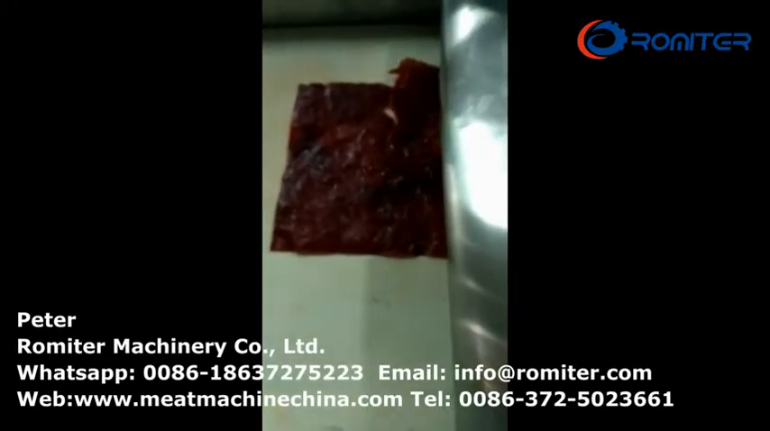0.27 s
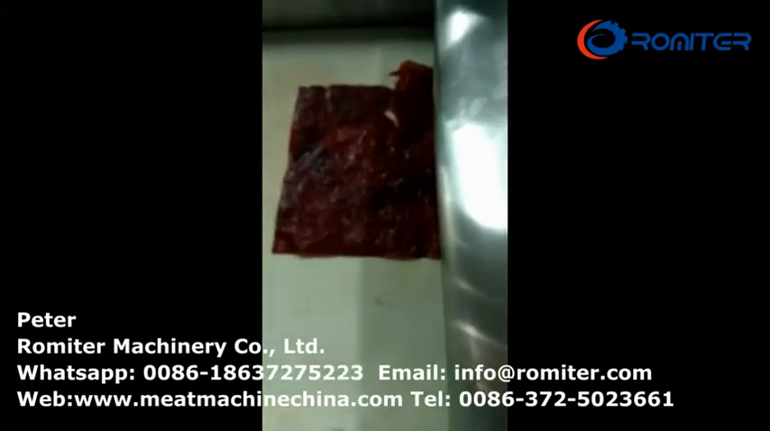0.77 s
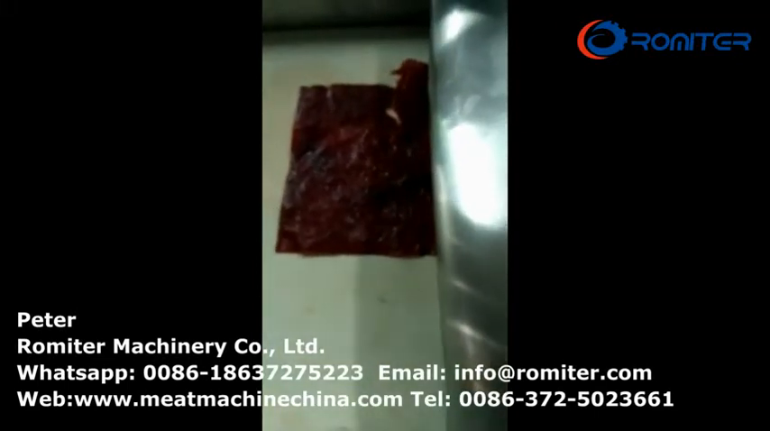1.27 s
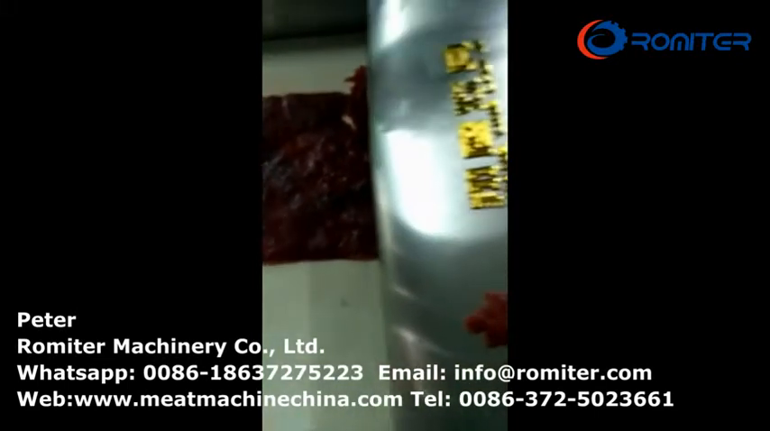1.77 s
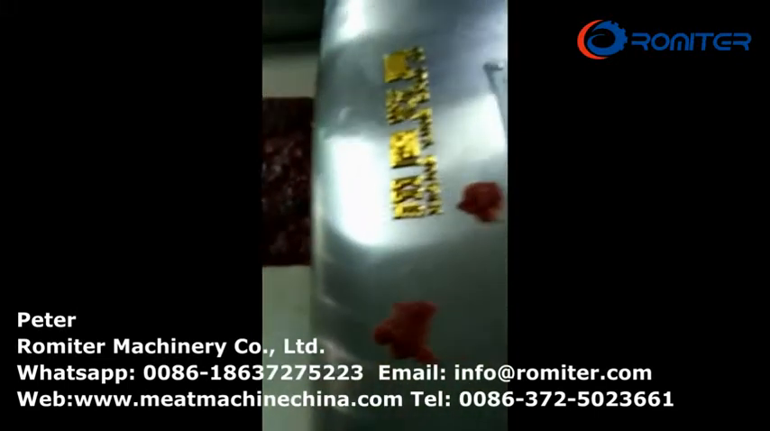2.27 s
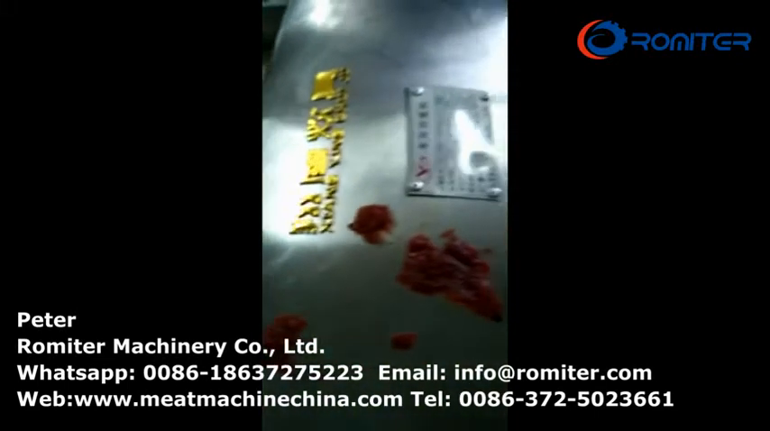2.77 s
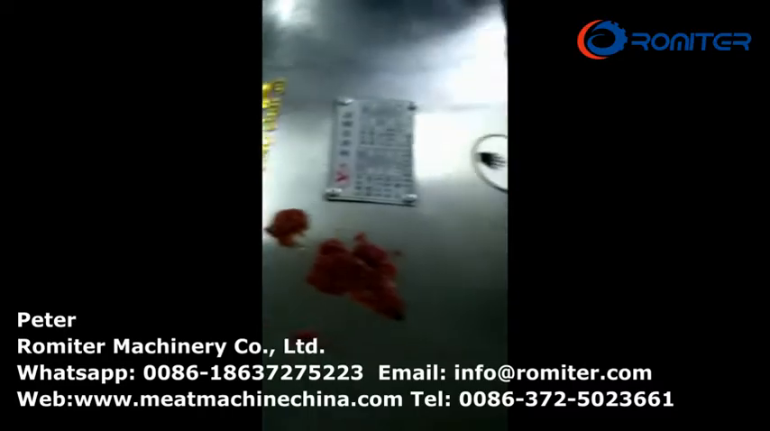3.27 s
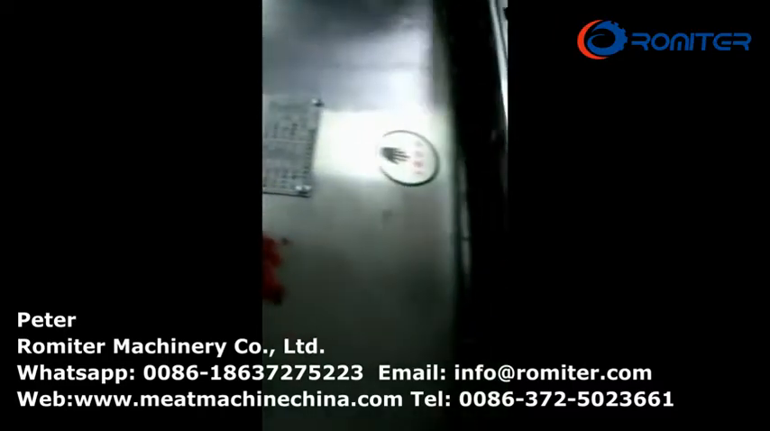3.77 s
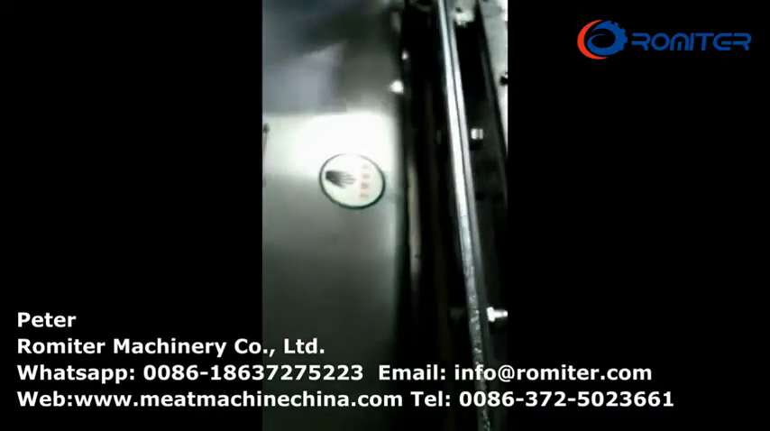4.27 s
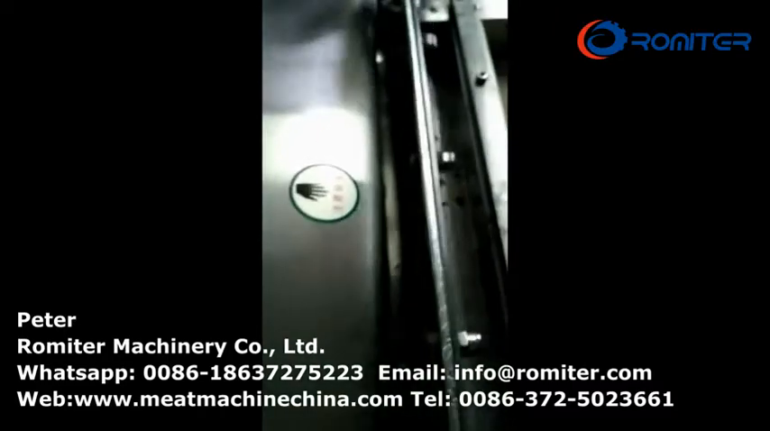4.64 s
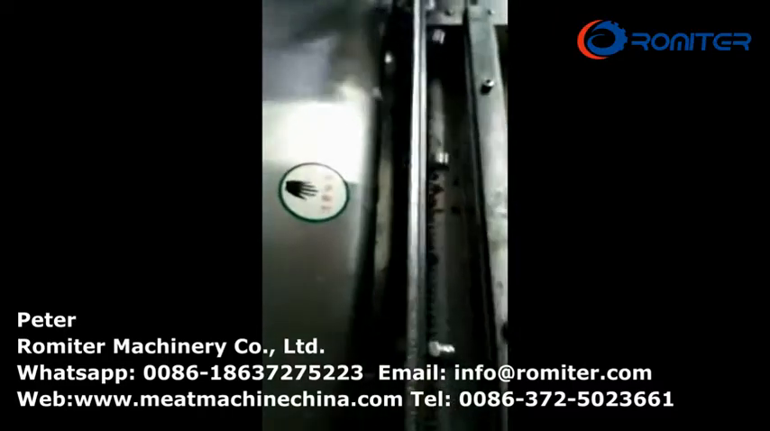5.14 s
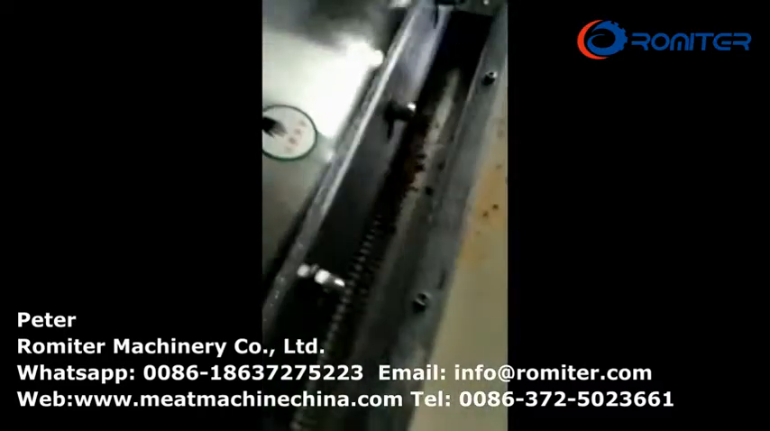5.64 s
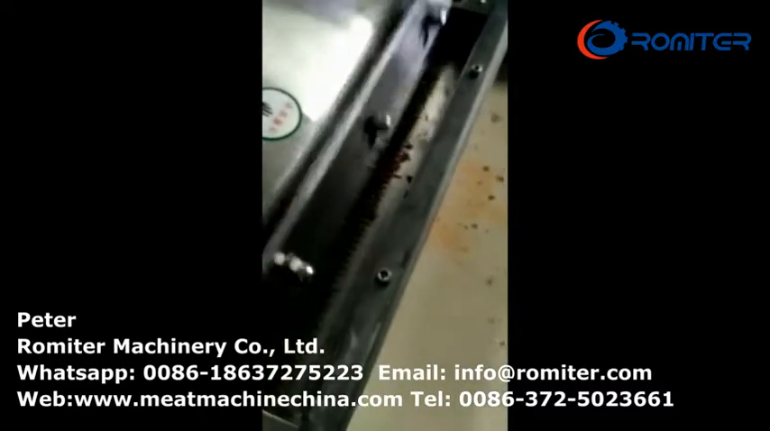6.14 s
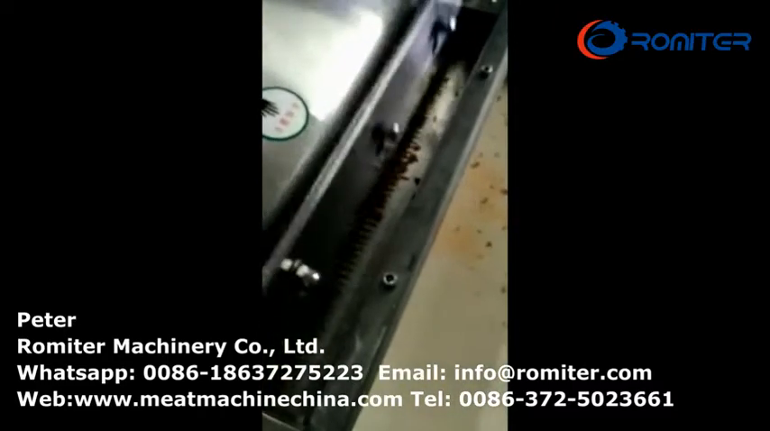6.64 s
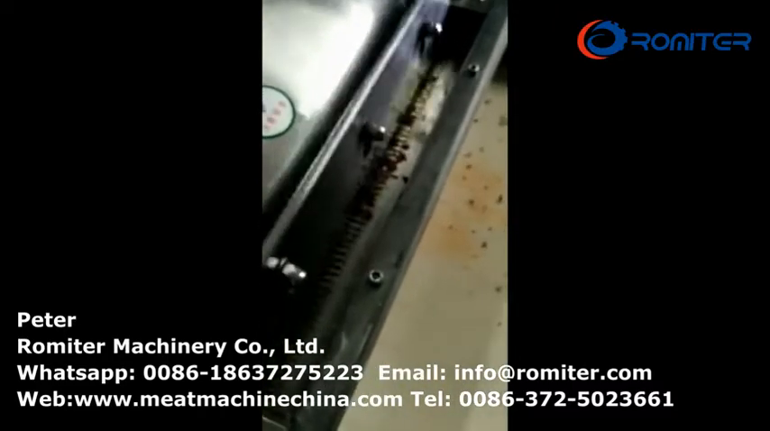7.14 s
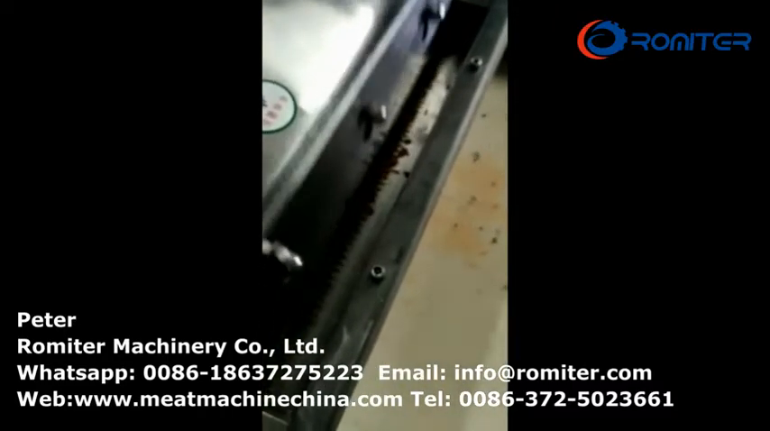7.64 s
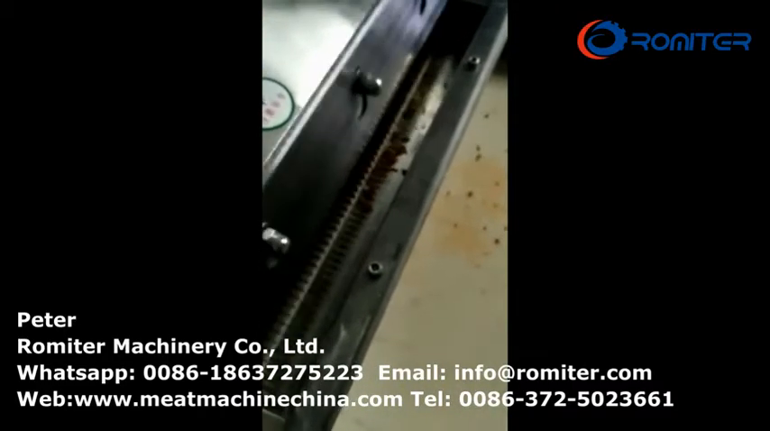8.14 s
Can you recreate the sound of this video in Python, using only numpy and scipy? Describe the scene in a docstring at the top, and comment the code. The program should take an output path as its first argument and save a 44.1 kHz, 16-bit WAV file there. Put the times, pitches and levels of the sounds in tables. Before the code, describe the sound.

A steel cutting machine pounds steadily in a factory hall, its blade scraping, thumping and clacking, loose parts rattling, growing squealier and heavier.

```python
"""Meat dicer in a factory hall

Close by, just under three strokes a second: the blade scrapes in with a thin squeal, cuts with a thump that shakes
the frame, clacks on its stop and knocks more softly on the way back. Loose parts rattle, the housing rings, a motor hums.
Contacts are chattering impulses into decaying noise; thump, boom and squeal are damped sines; the hum is wavering sines.
The hall is filtered noise. Slow curves follow the load and a microphone moving from feed tray to outlet."""
import sys
import numpy as np
from scipy import signal
from scipy.fft import rfft, irfft, next_fast_len
from scipy.io import wavfile

SR = 44100
rng = np.random.default_rng(int(sys.argv[2]) if len(sys.argv) > 2 else 0)


def generate_wav(signal):
    """Clip the signal to [-1, 1] and save it as 16-bit WAV at the path in sys.argv[1]."""
    frames = np.transpose(np.atleast_2d(signal))
    scaled = np.clip(frames, -1, 1) * 32767
    pcm = np.round(scaled).astype(np.int16)
    wavfile.write(sys.argv[1], SR, pcm)


N = 370440
CUTOFF_HZ = 16000
RING_T_S = np.arange(16384) / SR

# Colour of scrape, graze and ticks, relative spectrum: freq_hz, level_db
SCRAPE_SPECTRUM = [(700, -35), (1500, -7), (2200, -10.5), (3400, -4.5), (4900, 1), (6000, 2), (8200, -2.5),
                   (10500, 1.5), (12300, 7.5), (14000, -8), (15800, -16)]
# Colour of the cut: freq_hz, relative level_db
CUT_SPECTRUM = [(600, -9), (1300, -31), (2000, -0.5), (2450, -5.5), (2950, 0.5), (3800, 1.5), (4800, -8),
                (5600, 6), (7000, -3.5), (9300, -0.5), (12200, 0), (14000, -4), (15800, -9)]
# Colour of the clack on the stop: freq_hz, relative level_db
CLACK_SPECTRUM = [(700, -13), (1500, -16), (2300, 0), (2850, 7.5), (3400, 5), (4600, -2), (6600, -3.5),
                  (9200, -12.5), (11000, -9), (12600, -11.5), (14000, -16), (15800, -32)]
# Colour of the return knock and loose parts: freq_hz, relative level_db
RETURN_SPECTRUM = [(900, -10), (1900, -0.5), (2450, -5), (3400, 6), (4200, 2.5), (6600, -2.5), (8000, -2),
                   (9200, -8.5), (11000, -5.5), (12700, -3.5), (15800, -18)]
# Colour of the sheet-steel covers: freq_hz, relative level_db
COVER_SPECTRUM = [(300, -9.5), (420, -6.5), (560, -2.5), (710, -14), (860, -1.5), (1060, -1), (1300, -0.5),
                  (1600, -4.5), (2050, -2.5), (2700, -12.5), (5000, -11.5)]
# Colour of the cabinet walls' rumble: freq_hz, relative level_db
CABINET_SPECTRUM = [(60, -20), (120, -10), (220, -11), (310, 2.5), (400, 0.5), (520, -11.5), (700, -14),
                    (1500, -35)]
# Colour of the cabinet shudder at the stop: freq_hz, relative level_db
STOP_SHUDDER_SPECTRUM = [(55, -12), (85, -2), (115, 7.5), (165, -3), (230, 0.5), (310, 2), (420, -6.5),
                         (560, 0), (750, -20), (1500, -26)]
# Colour of the cabinet shudder at the turn: freq_hz, relative level_db
TURN_SHUDDER_SPECTRUM = [(55, -5), (85, -2.5), (120, -5), (170, -9.5), (240, -0.5), (400, -1.5), (570, -15),
                         (900, -12)]
# Noise of the hall: freq_hz, relative density_db
HALL_SPECTRUM = [(25, -26), (50, -7.5), (100, -0.5), (170, -3), (300, 3), (450, -2), (600, 1), (800, -7),
                 (1300, -11), (2200, -15.5), (4300, -17.5), (6000, -13), (8500, -19), (12000, -13),
                 (15800, -30)]
# Hum lines of the motor: freq_hz, mean rms level_db
HUM_LINES = [(86.5, -53), (100, -59), (193, -52.5), (391, -77), (646, -47.5)]

# Modes of the hollow thump: freq_hz, relative level_db, t60_s
THUMP_RING = [(308, 3, 0.022), (347, 7.5, 0.05), (381, 9, 0.048)]
# Modes of the frame boom: freq_hz, relative level_db, t60_s
FRAME_RING = [(48.1, -5.5, 0.68), (56, 5, 0.28), (72, -29, .14), (112.5, -12, 0.41), (164.6, -11, 0.49)]
# Modes of the squealing blade: freq_hz, relative level_db, t60_s
SQUEAL_RING = [(12857, 0, .12), (12790, -8, .05), (5066, -9, .09), (13700, -11, .1)]
# Modes of the squeaking guide: freq_hz, relative level_db, t60_s
SQUEAK_RING = [(1510, 12, 0.063), (1580, -19, .04)]

# Curve and event levels below are dB before each layer's own gain and the stroke spread.
# Microphone position along the machine: time_s, cabinet_shudder_db, hall_noise_db
POSITION_CURVE = [(0, -38, -34.5), (1.2, -28, -35), (2.4, -38, -36), (3.8, -36, -36), (5, -39, -35),
                  (6.2, -45.5, -36), (7, -35.5, -37), (8.4, -35.5, -34.5)]
# Microphone passing feed tray, covers, outlet: time_s, treble_db, clack_db, frame_boom_db
APPROACH_CURVE = [(0, -1.5, -12.5, -61), (1.1, 2.5, -12, -60), (1.8, -2.5, -11, -48), (2.5, 6, -13, -43.5),
                  (3.4, 7.5, -11, -41.5), (4.4, 3, -10.5, -35.5), (5.8, 2.5, -10.5, -37),
                  (6.7, -1, -9.5, -33), (8.4, 2.5, -10.5, -27.5)]
# Covers' answer to the cut: time_s, level_db, centre of ring_hz
COVER_CURVE = [(0.3, -19.5, 1350), (0.64, -24, 1490), (1.0, -20, 885), (1.34, -21.5, 846), (1.7, -20, 2080),
               (2.04, -18.5, 2070), (2.74, -23, 1630), (3.1, -22, 1220), (4.13, -22.5, 1250),
               (4.5, -31.5, 1280), (6.2, -36, 834), (8.4, -32, 830)]
# Force of the forward stroke as meat feeds through: time_s, scrape_db, thump_db, cut_db
LOAD_CURVE = [(0.3, -33, -22.5, -18), (1.3, -36, -24, -22), (2.0, -18.5, -22, -23), (3.0, -21, -16, -19.5),
              (4.1, -21, -16.5, -19.5), (4.9, -16.5, -20, -15.5), (6.2, -16.5, -23, -21),
              (7.2, -19, -23, -18.5), (8.3, -19.5, -22, -19.5)]
# Back stroke: time_s, level_db, brightness_db
BACK_STROKE_CURVE = [(0.15, -20.5, 12), (0.5, -18, 7), (0.85, -25.5, 3), (1.9, -21.5, 8), (3.9, -24.5, 7.5),
                     (4.4, -30.5, 0), (5.1, -25, 2), (6.4, -28.5, 3), (6.8, -23.5, 4), (8.2, -21, 1)]
# Bounce of the loose parts: time_s, after_clack_db, after_return_db
LOOSENESS_CURVE = [(0.3, -17.5, -11.5), (1.2, -13, -14.5), (1.8, -8.5, -25), (2.3, -20, -21.5),
                   (3.8, -28, -19.5), (4.3, -12, -14), (5.3, -26, -11), (6.1, -26, -33),
                   (6.7, -10.5, -11.5), (7.3, -23, -19), (8.4, -34, -9.5)]
# Centre of the standout ring: time_s, blade_at_cut_hz, blade_at_stop_hz, covers_after_clack_hz
RING_CURVE = [(0.3, 3040, 3040, 1260), (1.1, 3250, 3240, 1130), (1.75, 2670, 3250, 1870),
              (2.1, 2600, 3000, 1330), (2.45, 3160, 4330, 1240), (3.15, 2880, 4300, 1300),
              (3.5, 3320, 2800, 1490), (4.2, 3150, 3770, 1480), (4.9, 2770, 3400, 1540),
              (6.2, 2800, 3700, 1700), (6.7, 2950, 2780, 1750), (8.4, 2770, 2900, 1600)]
# Friction of the slide: time_s, squeal_db, scrape_brightness_db
FRICTION_CURVE = [(0.3, -46, -11), (1.65, -43, -27), (2.1, -33, -1), (3.0, -27, 3), (4.4, -20, 0),
                  (5.0, -15, -6), (5.5, -35, -5), (6.0, -19, -4), (6.9, -22, -10), (7.8, -22, -6),
                  (8.3, -20, -1)]
# Sharp ticks, mostly as the blade starts to slide, one (4.377) a bright bounce after the return: time_s, level_db
TICK_EVENTS = [(3.7618, -5.5), (4.1082, -5.5), (4.377, -3), (4.461, -7), (4.808, -4.5), (5.157, -2),
               (6.206, -4), (6.9057, -2), (7.2576, -5), (7.6066, -15)]
# Thump pitch, deeper toward the outlet: time_s, shift as a share
THUMP_SHIFT_CURVE = [(0, 0.012), (4.0, -0.0047), (8.4, -0.045)]

# Even crank; contact places count from the clack
FIRST_CLACK_S, STROKE_S = 0.0063, 0.3496
SLIDE_S, PUSH_S, CUT_S, RETURN_S = -0.0915, -0.0752, -0.068, 0.1466
# Bounce delays after the clack and after the return
CLACK_BOUNCE_S, RETURN_BOUNCE_S = 0.046, 0.030
# Spans (from, to) of guide squeak, edge ticks and blade grazes
SQUEAKING_S, TICKING_S, GRAZING_S = (2.2, 4.3), (2, 7), (4, 8.4)
# Random spread between strokes: level; log ring pitch
STROKE_SPREAD_DB, RING_SPREAD = 0.5, 0.031
# Swing added on even strokes, taken off on odd ones
SCRAPE_SWING_DB, SQUEAL_SWING_DB = -0.4, 4
CLACK_BRIGHT_DB, TICK_BRIGHT_DB = 8.5, 6
CLACK_BOUNCE_BRIGHT_DB, RETURN_BOUNCE_BRIGHT_DB = -4.5, 8.5


def from_db(db):
    """Gain of a level in dB."""
    return 10 ** (np.asarray(db) / 20)


def at_level(x, db, count):
    """Scale so the first count samples have this rms level."""
    return x * from_db(db) / np.sqrt(np.mean(x[:count] ** 2) + 1e-20)


def add(out, s, x):
    """Mix a sound in at time s."""
    i = int(np.clip(round(s * SR), 0, N))
    out[i:i + len(x)] += x[:N - i]


def dying(t60_s):
    """Exponential decay that loses 60 dB in t60_s."""
    return np.exp(-np.log(1000) * RING_T_S / max(t60_s, 1e-3))


def coloured(x, points, bright_db=0, peak_hz=1000, peak_db=0):
    """Minimum-phase filter through (Hz, dB) points, tipped around 5 kHz, with one optional resonance."""
    size = next_fast_len(len(x) // 2 + 1) * 2
    log_hz = np.log(np.maximum(np.fft.rfftfreq(size, 1 / SR), 1))
    hz, db = np.transpose(points)
    body_db = np.interp(log_hz, np.log(hz), db)
    skirt_db = 18 * np.minimum(log_hz - np.log(hz[0]), 0)
    tilt = np.interp(log_hz, np.log([3000, 10000]), [-.5, .5])
    resonance_db = peak_db / (1 + ((log_hz - np.log(peak_hz)) / 0.1) ** 2)
    gain = from_db(body_db + skirt_db + bright_db * tilt + resonance_db)
    # Folding the cepstrum makes the filter causal
    cepstrum = irfft(np.log(gain))
    cepstrum[1:size // 2] *= 2
    cepstrum[size // 2 + 1:] = 0
    return irfft(rfft(x, size) * np.exp(rfft(cepstrum)))[:len(x)]


def strokes(place_s, span_s=(0, N / SR)):
    """Times at which the crank passes one place in its stroke."""
    s = np.arange(FIRST_CLACK_S, N / SR + STROKE_S, STROKE_S) + place_s
    return s[(s >= span_s[0]) & (s < span_s[1])]


def along(curve, s):
    """Columns of a slow curve at the times s."""
    when, *columns = np.transpose(curve)
    return [np.interp(s, when, column) for column in columns]


def hits(s, db, *columns):
    """One row per contact, (s, dB, ...), with a random level spread."""
    level_db = db + STROKE_SPREAD_DB * rng.standard_normal(len(s))
    return np.column_stack(np.broadcast_arrays(s, level_db, *columns))


def ring_pitches(hz, s):
    """Ring pitch shifts with the point of contact."""
    return hz * np.exp(RING_SPREAD * rng.standard_normal(len(s)))


def alternation(s):
    """+1 and -1 in turn from stroke to stroke."""
    return 1 - 2 * (np.round((s - FIRST_CLACK_S) / STROKE_S) % 2)


def excite(body, force):
    """Response of a body to a force."""
    return signal.fftconvolve(force, body)[:len(RING_T_S)]


def modes(table, detune=0):
    """Damped sines set off together."""
    return sum(from_db(db) * dying(t60_s) * np.sin(2 * np.pi * hz * (1 + detune) * RING_T_S)
               for hz, db, t60_s in table)


def steel_plate(fixed_modes, likeness):
    """Dense modes as noise: partly shared by all strokes, partly new as the contact point shifts."""
    likeness = np.clip(likeness, 0, 1)
    return np.sqrt(likeness) * fixed_modes + np.sqrt(1 - likeness) * rng.standard_normal(len(RING_T_S))


def chatter(count, length_s, last_db):
    """First touch, then uneven bounces over about length_s whose level trends to last_db."""
    when = (np.arange(count) + rng.uniform(-.5, .5, count)) / (count - 1)
    when[0] = 0
    size = from_db(last_db * when + rng.normal(0, 2.5, count))
    size[0] = 1.6
    force = np.zeros(len(RING_T_S))
    np.add.at(force, (when * abs(length_s) * SR).astype(int), size * rng.choice([-1, 1], count))
    return force


def blows(rows, colour, chatter_s, last_db, ring_t60, tail_db, tail_t60, gain_db, likeness, count, size,
          peak_db=0):
    """Steel on steel: count bounces excite a short ring plus a tail of machine and hall."""
    out, fixed_modes = np.zeros(N), rng.standard_normal(len(RING_T_S))
    spread = 1 - np.exp(-RING_T_S / 0.00079)  # the blow spreads through the steel
    decay = spread * np.hypot(dying(ring_t60), from_db(tail_db) * dying(tail_t60))
    for s, db, bright_db, *ring_hz in rows:
        hit = excite(steel_plate(fixed_modes, likeness) * decay, chatter(count, chatter_s, last_db))
        hit = coloured(hit, colour, bright_db, *ring_hz, peak_db=peak_db)
        add(out, s, at_level(hit, db + gain_db, size))
    return out


def panels(rows, colour, swell_s, t60, gain_db, likeness, size, peak_db=0):
    """Large panels take up a blow slowly and ring on; rows are (s, dB) or (s, dB, ring Hz)."""
    out, fixed_modes = np.zeros(N), rng.standard_normal(len(RING_T_S))
    swell = (1 - np.exp(-(RING_T_S / swell_s) ** 2)) * dying(t60)
    for s, db, *ring_hz in rows:
        ring = coloured(steel_plate(fixed_modes, likeness) * swell, colour, 0, *ring_hz, peak_db=peak_db)
        add(out, s, at_level(ring, db + gain_db, size))
    return out


def friction_tone(rows, table, rub_s, gain_db):
    """Rubbing noise makes a few modes sing, slightly detuned each time; rows are (s, dB)."""
    out = np.zeros(N)
    for s, db in rows:
        body = modes(table, rng.normal(0, .003))
        rub = rng.standard_normal(len(RING_T_S)) * np.exp(-(RING_T_S / rub_s) ** 4)
        add(out, s, at_level(excite(body, rub), db + gain_db, count=1100))
    return out


def wavering(x, waver_db):
    """Low part of the noise swells and sinks unevenly, band by band."""
    edges_hz = np.geomspace(130, 1300, 9)
    knots, out = np.linspace(0, N, 110), x.copy()
    for low, high in zip(edges_hz, edges_hz[1:]):
        band = signal.sosfiltfilt(signal.butter(2, [low, high], "band", fs=SR, output="sos"), x)
        swell = np.interp(np.arange(N), knots, rng.standard_normal(len(knots)))
        out += band * (from_db(waver_db * (swell - .5)) - 1)
    return out


def motor(waver_db):
    """Drive hum: sines wavering in level and phase."""
    t, out = np.arange(N) / SR, np.zeros(N)
    knots = np.linspace(0, t[-1], 60)
    for hz, db in HUM_LINES:
        level = np.interp(t, knots, rng.standard_normal(len(knots)))
        phase = np.interp(t, knots, rng.standard_normal(len(knots)))
        out += from_db(db + waver_db * level) * np.sqrt(2) * np.sin(2 * np.pi * hz * t + .5 * phase)
    return out


def hall():
    """Hall noise: coloured noise, uneven in the lows, following the microphone position."""
    noise = wavering(coloured(rng.standard_normal(N), HALL_SPECTRUM), waver_db=5.0)
    return at_level(noise, along(POSITION_CURVE, np.arange(N) / SR)[1], N)


def clack():
    """Blade hits its stop, louder as the microphone nears."""
    s = strokes(0)
    treble_db, clack_db, _ = along(APPROACH_CURVE, s)
    rows = hits(s, clack_db, CLACK_BRIGHT_DB + treble_db, ring_pitches(along(RING_CURVE, s)[1], s))
    return blows(rows, CLACK_SPECTRUM, chatter_s=.018, last_db=-1, ring_t60=0.055, tail_db=-13.5,
                 tail_t60=0.19, gain_db=0.72, likeness=.2, count=7, size=1323, peak_db=2)


def housing():
    """Sheet-steel covers answer clack, return and cut with a slower-rising ring."""
    clack_s, back_s, cut_s = strokes(0), strokes(RETURN_S), strokes(CUT_S)
    clack_hz = ring_pitches(along(RING_CURVE, clack_s)[2], clack_s)
    cover_db, cover_hz = along(COVER_CURVE, cut_s)
    after_clack = panels(hits(clack_s, 0, clack_hz), COVER_SPECTRUM, swell_s=0.015, t60=0.19,
                         gain_db=-25, likeness=0.26, size=1984, peak_db=12.5)
    after_return = panels(hits(back_s, along(BACK_STROKE_CURVE, back_s)[0]), COVER_SPECTRUM,
                          swell_s=0.0015, t60=0.54, gain_db=-14, likeness=0.3, size=1984)
    after_cut = panels(hits(cut_s, cover_db, cover_hz), COVER_SPECTRUM, swell_s=0.0028, t60=0.17,
                       gain_db=2.5, likeness=0.033, size=1764, peak_db=9.5)
    return after_clack + after_return + after_cut


def shudder():
    """Cabinet shudders at both ends of the blade's travel, swelling slowly at the turn."""
    stop_s, turn_s = strokes(0), strokes(RETURN_S)
    stop = panels(hits(stop_s, along(POSITION_CURVE, stop_s)[0]), STOP_SHUDDER_SPECTRUM,
                  swell_s=0.0023, t60=0.39, gain_db=0.0, likeness=0.71, size=2205)
    turn = panels(hits(turn_s, along(POSITION_CURVE, turn_s)[0]), TURN_SHUDDER_SPECTRUM,
                  swell_s=0.058, t60=0.11, gain_db=-4.5, likeness=0.77, size=2205)
    return stop + turn


def rattle():
    """Loose parts bounce dully after the clack and brightly after the return."""
    dull_s, bright_s = strokes(CLACK_BOUNCE_S), strokes(RETURN_S + RETURN_BOUNCE_S)
    dull = hits(dull_s, along(LOOSENESS_CURVE, dull_s)[0], CLACK_BOUNCE_BRIGHT_DB)
    bright = hits(bright_s, along(LOOSENESS_CURVE, bright_s)[1], RETURN_BOUNCE_BRIGHT_DB)
    return blows(np.vstack([dull, bright]), RETURN_SPECTRUM, chatter_s=0.0041, last_db=-13, ring_t60=0.025,
                 tail_db=6, tail_t60=0.096, gain_db=-10.0, likeness=0.45, count=3, size=882)


def clatter():
    """Bounce after the clack shakes the covers once more."""
    s = strokes(CLACK_BOUNCE_S)
    rows = hits(s, along(LOOSENESS_CURVE, s)[0], ring_pitches(along(RING_CURVE, s)[2], s))
    return panels(rows, COVER_SPECTRUM, swell_s=0.002, t60=0.13, gain_db=-14.5, likeness=0.18, size=1100,
                  peak_db=4)


def return_knock():
    """Blade knocks on its way back: four bounces into a bright ring."""
    s = strokes(RETURN_S)
    return blows(hits(s, *along(BACK_STROKE_CURVE, s)), RETURN_SPECTRUM, chatter_s=0.022, last_db=-6.5,
                 ring_t60=0.066, tail_db=-4.0, tail_t60=0.084, gain_db=1.5, likeness=0.27, count=4, size=1323)


def slides(s):
    """Blade slides in, its level following the load: rows (s, dB, brightness dB)."""
    scrape_db = along(LOAD_CURVE, s)[0] + SCRAPE_SWING_DB * alternation(s)
    return hits(s, scrape_db, along(FRICTION_CURVE, s)[1])


def scrape():
    """Blade rubs into the machine: a growing run of small touches."""
    return blows(slides(strokes(SLIDE_S)), SCRAPE_SPECTRUM, chatter_s=0.02, last_db=9, ring_t60=0.025,
                 tail_db=-18.5, tail_t60=0.3, gain_db=-3.5, likeness=0.22, count=9, size=800)


def squeal():
    """Sliding blade sings in a few high modes, stronger on every second stroke."""
    s = strokes(SLIDE_S)
    rows = hits(s, along(FRICTION_CURVE, s)[0] + SQUEAL_SWING_DB * alternation(s))
    return friction_tone(rows, SQUEAL_RING, rub_s=0.0077, gain_db=0.5)


def push(push_s, heave_s, boom_db, boom_lag_s):
    """Stroke shoves the cabinet: hollow thump, rumble of the walls, slow boom of the frame."""
    out, when = np.zeros(N), strokes(PUSH_S)
    for s, db, frame_db in hits(when, along(LOAD_CURVE, when)[1], along(APPROACH_CURVE, when)[2]):
        detune = along(THUMP_SHIFT_CURVE, s)[0] + rng.normal(0, 0.022)
        thump = modes(THUMP_RING, detune) * (1 - np.exp(-(RING_T_S / push_s) ** 2))
        boom = modes(FRAME_RING, rng.normal(0, 0.0035)) * (1 - np.exp(-(RING_T_S / heave_s) ** 2))
        add(out, s, at_level(thump, db, count=882))
        add(out, s + boom_lag_s, at_level(boom, frame_db + boom_db, count=4410))
    rumble = panels(hits(when, 0), CABINET_SPECTRUM, swell_s=0.0081, t60=0.22, gain_db=-28, likeness=1.0,
                    size=2205)
    return out + rumble


def cut():
    """Blade meets the grid: a blow with one standout ring."""
    s = strokes(CUT_S)
    ring_hz = ring_pitches(along(RING_CURVE, s)[0], s)
    rows = hits(s, along(LOAD_CURVE, s)[2], along(APPROACH_CURVE, s)[0], ring_hz)
    return blows(rows, CUT_SPECTRUM, chatter_s=.006, last_db=-29, ring_t60=0.053, tail_db=-25, tail_t60=0.3,
                 gain_db=1.5, likeness=0.39, count=4, size=1323, peak_db=13.0)


def bite():
    """Edge ticks sharply as the push begins, louder with a harder push."""
    s = strokes(PUSH_S, TICKING_S)
    return blows(hits(s, along(LOAD_CURVE, s)[1], 0), SCRAPE_SPECTRUM, chatter_s=.003, last_db=18,
                 ring_t60=0.011, tail_db=-30, tail_t60=0.58, gain_db=3.5, likeness=0.12, count=2, size=350)


def squeak():
    """Guide squeaks: rubbing sets off its two modes."""
    rows = hits(strokes(SLIDE_S, SQUEAKING_S), 0)
    return friction_tone(rows, SQUEAK_RING, rub_s=0.019, gain_db=-30.5)


def sharp_ticks():
    """Sharp ticks, two touches each: mostly as the blade starts to slide, one a bright bounce after the return."""
    rows = [(s, db, TICK_BRIGHT_DB) for s, db in TICK_EVENTS]
    return blows(rows, SCRAPE_SPECTRUM, chatter_s=.003, last_db=-3, ring_t60=0.022, tail_db=-21,
                 tail_t60=0.18, gain_db=-9, likeness=0.19, count=2, size=300)


def graze():
    """Blade grazes its guide just before it slides in."""
    rows = slides(strokes(SLIDE_S - .0105, GRAZING_S))
    return blows(rows, SCRAPE_SPECTRUM, chatter_s=0.01, last_db=18.5, ring_t60=0.041, tail_db=-41,
                 tail_t60=0.087, gain_db=-10, likeness=0.26, count=6, size=440)


def scene():
    """The whole machine at one microphone."""
    background = motor(waver_db=-0.2) + hall()
    stop_and_return = clack() + housing() + shudder() + rattle() + clatter() + return_knock()
    shove = push(push_s=0.0028, heave_s=0.014, boom_db=2.0, boom_lag_s=0.0074)
    forward = scrape() + squeal() + shove + cut()
    occasional = bite() + squeak() + sharp_ticks() + graze()
    return (background + stop_and_return + forward + occasional)[None]


def record(dry):
    """Soft-clip the loudest peaks, then low-pass steeply."""
    top = 0.97
    steep = signal.ellip(14, .1, 100, CUTOFF_HZ, fs=SR, output="sos")
    return signal.sosfilt(steep, top * np.tanh(dry / top))


dry = scene()
out = record(dry)
generate_wav(out)
```